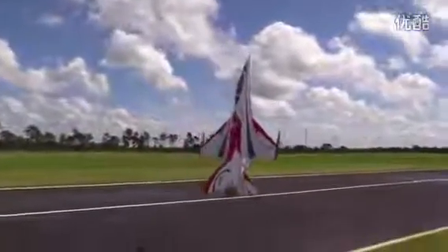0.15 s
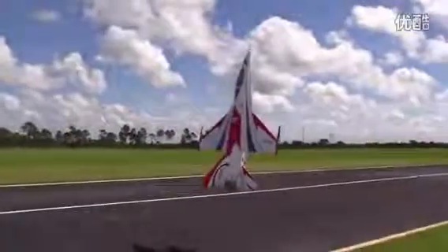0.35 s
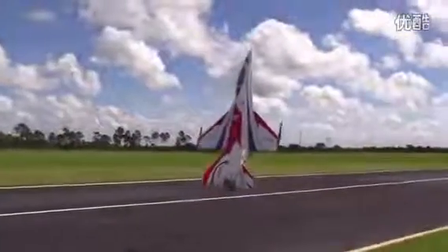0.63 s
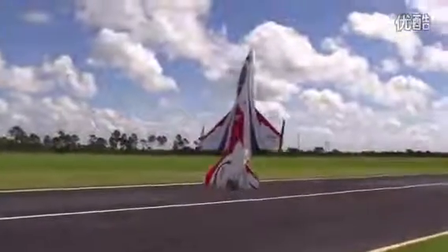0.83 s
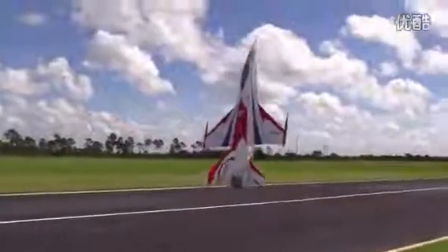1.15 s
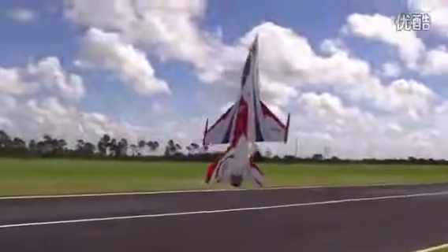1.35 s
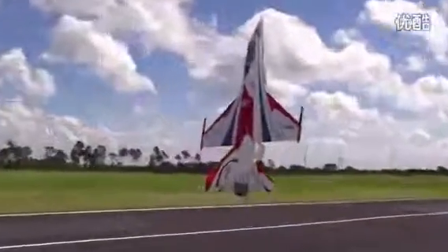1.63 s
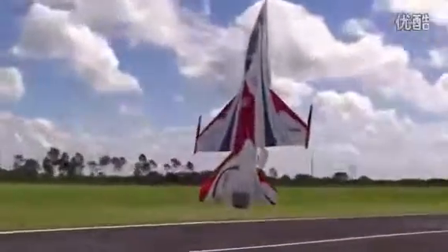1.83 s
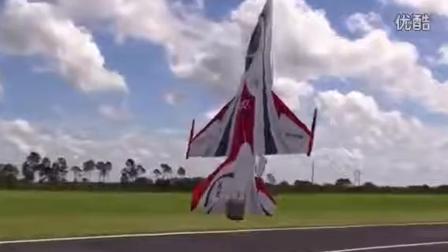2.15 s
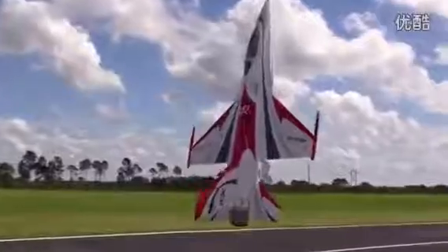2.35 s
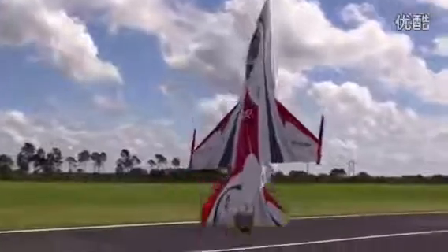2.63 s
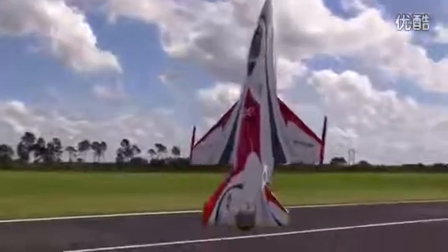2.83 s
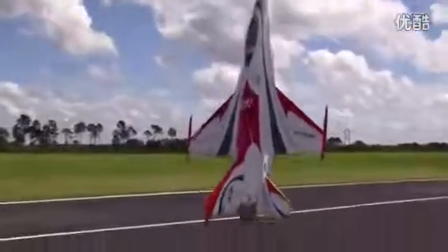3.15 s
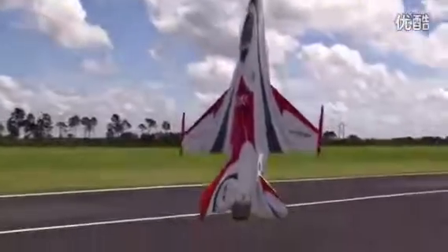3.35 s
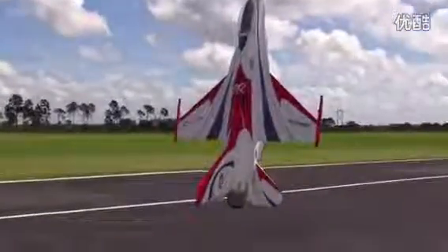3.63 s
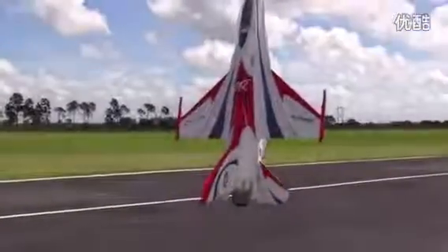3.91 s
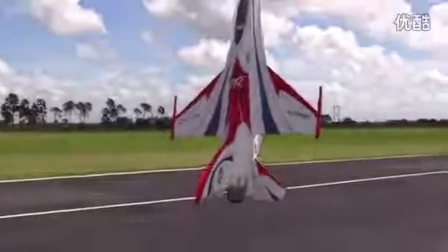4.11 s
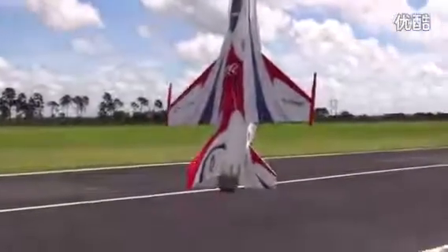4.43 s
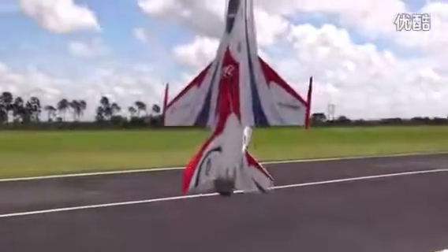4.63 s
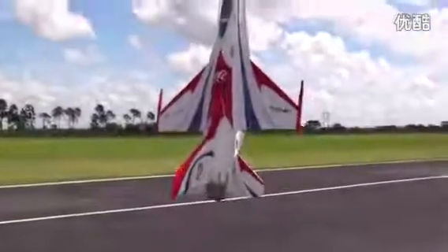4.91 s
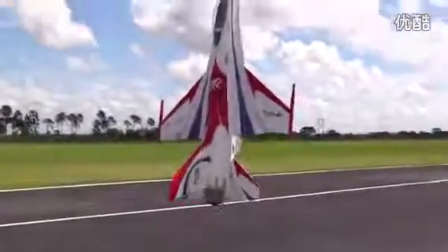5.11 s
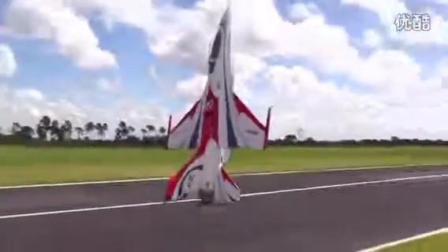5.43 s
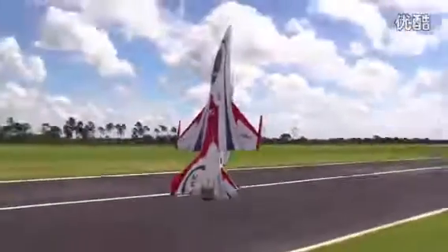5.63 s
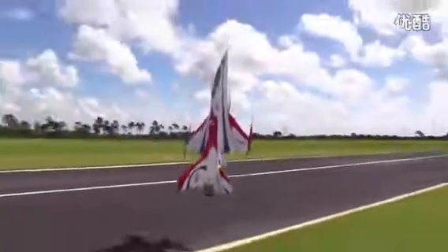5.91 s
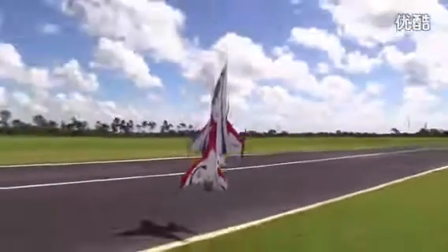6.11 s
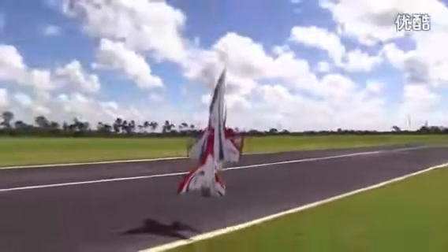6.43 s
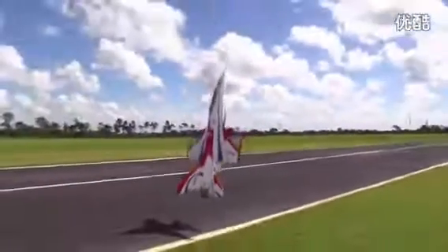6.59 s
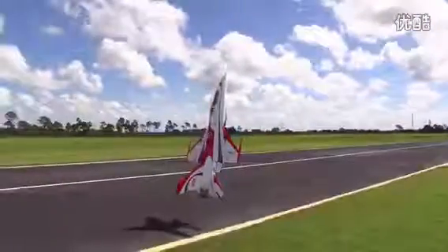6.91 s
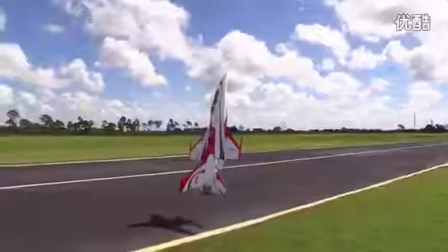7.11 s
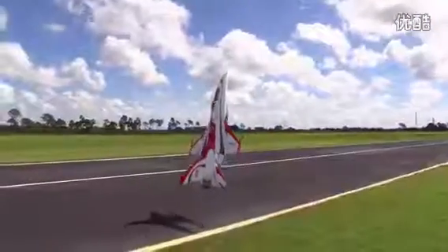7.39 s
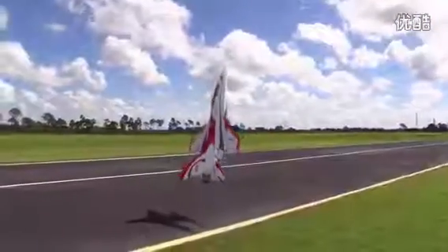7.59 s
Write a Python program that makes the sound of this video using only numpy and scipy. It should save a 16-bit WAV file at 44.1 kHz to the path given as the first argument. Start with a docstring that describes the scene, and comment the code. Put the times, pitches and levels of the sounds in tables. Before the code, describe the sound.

Outdoors over a runway, the exhaust of a small hovering jet plane roars and hisses without a break. Brief flares of hiss come and go while a hollow whine glides up, sinks and rises again within the rush. A faint rumble puffs underneath, and the engine is strongest towards the end. The microphone gives a thin, slightly watery mono sound.

```python
"""A model jet hovers on its tail just above a runway, drifting towards the listener and away again.
Its turbulent exhaust is a roar, a rush and a hiss that swells as the nozzle swings, over a faint rumble.
The tarmac returns an echo about a millisecond late, and the changing lag sweeps a hollow, whining pitch
through the noise. The sound is mono and thin in the bass; a noise suppressor deepens its hollows."""
import sys
import numpy as np
from scipy import signal
from scipy.fft import rfft, irfft
from scipy.io import wavfile
from scipy.ndimage import uniform_filter1d, map_coordinates

SR = 44100
rng = np.random.default_rng(int(sys.argv[2]) if len(sys.argv) > 2 else 0)


def master_out(mix):
    """Clip the mix to full scale and print it as 16-bit PCM to the path in sys.argv[1]."""
    frames = np.transpose(np.atleast_2d(mix))
    ceiling = np.clip(frames, -1, 1)
    pcm = np.round(ceiling * 32767).astype(np.int16)
    wavfile.write(sys.argv[1], SR, pcm)


N = 341775
TIME = np.arange(N) / SR
BINS_HZ = np.maximum(np.arange(N // 2 + 1) * SR / N, 1)


def from_db(db):
    """Decibels to gain."""
    return 10 ** (np.asarray(db) / 20)


def rms_one(x):
    """Scale to rms 1."""
    return x / np.sqrt(np.mean(x ** 2) + 1e-20)


def curves(rows):
    """Draw each column after the time as an automation curve, one value a sample."""
    seconds, *columns = np.transpose(rows)
    return [np.interp(TIME, seconds, column) for column in columns]


def swells(rows):
    """Smooth bumps and dips in dB, each centred on its time."""
    return sum(db * np.cos(np.pi * np.clip((TIME - centre) / length, -.5, .5)) ** 2
               for centre, length, db in rows)


def drift(rate):
    """Random wander with spread 1 that changes about `rate` times a second."""
    hop, settle = 40, 2000
    pole = np.exp(-2 * np.pi * rate * hop / SR)
    noise = rng.standard_normal(N // hop + settle + 2)
    slow = signal.lfilter([1], [1, -2 * pole, pole * pole], noise)[settle:]
    return np.interp(np.arange(N) / hop, np.arange(len(slow)), rms_one(slow))


def coloured(x, spectrum):
    """Equalise by a spectrum that falls 40 dB an octave beyond its ends."""
    hz, db = np.transpose(spectrum)
    octaves_out = np.abs(np.log2(BINS_HZ / np.clip(BINS_HZ, hz[0], hz[-1])))
    gain_db = np.interp(np.log(BINS_HZ), np.log(hz), db) - 40 * octaves_out
    return irfft(rfft(x) * from_db(gain_db), N)


def turbulence(spectrum, level_db, flutter_db, flutter_rate):
    """Noise of one range of eddy sizes, fluttering about its level."""
    noise = rms_one(coloured(rng.standard_normal(N), spectrum))
    return noise * from_db(level_db + flutter_db * drift(flutter_rate))


def ride_band(x, low_hz, high_hz, lift_db):
    """One band swells and fades on its own."""
    bandpass = signal.butter(3, [low_hz, high_hz], "band", fs=SR, output="sos")
    return x + signal.sosfilt(bandpass, x) * (from_db(lift_db) - 1)


def rippled(x, share, longest_ms, rate, count):
    """Short delays fade in and out and ripple the spectrum: a patchy, slightly watery texture."""
    lags = (rng.uniform(longest_ms / 10, longest_ms, count) * SR / 1000).astype(int)
    taps = sum(np.roll(x, lag) * drift(rate) for lag in lags) / np.sqrt(count)
    return (x + share * taps) / np.sqrt(1 + share ** 2)


# The rumble's tone. Each row: frequency in Hz, relative level in dB.
RUMBLE_TONE = [(25, -20), (60, -22), (110, -18), (170, -6.2), (250, 0), (350, 1.2), (480, 1.8), (650, -7),
               (1000, -26)]
# Its fader ride. Each row: time in seconds, relative level in dB.
RUMBLE_RIDE = [(0, -65.5), (.5, -69), (.85, -58.5), (1.25, -62.5), (2.5, -56.5), (3.1, -62), (3.6, -56.5),
               (4.15, -55), (4.65, -56), (4.84, -45), (5.0, -51.5), (5.35, -56), (5.75, -55), (6.0, -51.5),
               (6.4, -51), (7.1, -56.5), (7.75, -60)]
# It drops out briefly. Each row: centre in seconds, length in seconds, dip in dB.
RUMBLE_LULLS = [(3.705, 0.15, -19), (3.9, 0.1, -14), (4.04, 0.096, -15), (4.195, .13, -17),
                (4.443, 0.27, -20), (4.722, 0.1, -21), (4.96, .1, -6), (5.495, 0.1, -11),
                (6.07, 0.054, -12), (6.27, 0.085, -18), (6.565, 0.099, -18), (6.733, .06, -20),
                (6.92, 0.054, -12), (7.62, 0.11, -20)]
# It puffs as the exhaust slaps the tarmac. Each row: peak in seconds, length in seconds, lift in dB.
RUMBLE_PUFFS = [(3.99, .1, 2.5), (4.1, .1, 3), (4.63, .18, 8), (5.05, .12, 7.5), (5.4, .07, 4),
                (5.62, 0.18, 8), (5.79, .08, 4), (5.89, .06, 7), (6.0, 0.12, 6), (6.125, 0.078, 6),
                (6.66, .12, 1), (6.83, 0.053, 6), (7.07, 0.065, 7.5), (7.125, .06, 8)]

def tarmac_rumble():
    """The jet spreads over the tarmac in a deep, uneven rumble."""
    ride_db, = curves(RUMBLE_RIDE)
    level_db = ride_db + swells(RUMBLE_LULLS) + swells(RUMBLE_PUFFS) + 6
    return turbulence(RUMBLE_TONE, level_db, flutter_db=2.5, flutter_rate=17)


# The tones of the plume's three layers. Each row: frequency in Hz, relative level in dB.
ROAR_TONE = [(490, -42), (575, -29), (640, -21), (720, -6.3), (820, -1.7), (1000, 1.6), (1300, -1),
             (1600, -4.5), (1850, -1.5), (2200, -7.5)]
RUSH_TONE = [(1100, -23), (1450, -4), (1750, -6), (2100, -0.5), (2550, -2), (3000, 0.04), (3500, -3.5),
             (4000, -2.5), (4500, -5.5), (5200, -6.5), (7000, -39.5)]
HISS_TONE = [(2500, -21), (3800, -14), (4700, -3.5), (5400, 2.5), (6200, 1.65), (7400, 0.5), (8200, -1.5),
             (8900, -5), (9580, -5.5), (9750, -11.5), (10300, -11), (10800, -26.5)]
# Fader rides that follow throttle and distance.
# Each row: time in seconds, then relative levels in dB of the roar, the rush and the hiss.
PLUME_RIDES = [(0.0, -25.5, -23, -22), (0.57, -25, -25, -22), (0.92, -24, -23.3, -24.5),
               (1.12, -23.7, -22.5, -25.3), (1.35, -28.5, -23, -24.5), (2.07, -26, -24.2, -22.7),
               (2.59, -23.5, -22.5, -23), (2.77, -23, -23, -23), (3.4, -24, -22, -22.5),
               (3.87, -22.5, -23, -23.5), (4.18, -23.5, -21.5, -21), (4.48, -24.5, -24.5, -26),
               (4.96, -22.2, -20.5, -20.1), (5.3, -27.5, -23, -23), (5.65, -25.5, -23.5, -23),
               (6.07, -24.5, -20.5, -22), (6.3, -25.5, -23.5, -24.5), (6.98, -26, -22, -23.5),
               (7.15, -22.5, -18.5, -21), (7.5, -19.5, -19.5, -22), (7.75, -20.5, -20.5, -20.5)]
# The plume turns towards the listener. Each row: peak in seconds, length in seconds, lift in dB.
RUSH_SURGES = [(2.18, 0.14, 3.5), (2.54, 0.28, 2.2), (4.22, .25, 1), (5.6, 0.19, 3.5), (7.48, .13, 0.5)]

def plume(swing_db):
    """Large eddies far down the plume roar, the plume rushes, and small eddies at the nozzle hiss."""
    roar_db, rush_db, hiss_db = curves(PLUME_RIDES)
    rush_db = rush_db + 0.29 * swing_db + swells(RUSH_SURGES)
    roar = turbulence(ROAR_TONE, roar_db + 0.5, flutter_db=0.5, flutter_rate=13)
    rush = turbulence(RUSH_TONE, rush_db + 0.34, flutter_db=0.53, flutter_rate=12)
    hiss = turbulence(HISS_TONE, hiss_db + swing_db, flutter_db=0.63, flutter_rate=9.4)
    return roar, rush, hiss


# The low edge near 600 Hz drops out briefly. Each row: centre in seconds, length in seconds, dip in dB.
EDGE_DROPOUTS = [(3.57, 0.31, -18), (4.33, 0.11, -12), (5.2, .13, -14), (5.45, 0.17, -14),
                 (6.05, 0.071, -9), (6.35, 0.14, -10)]
# The rush's beam near 3 kHz sweeps across the listener in a piercing flare.
# Each row: peak in seconds, length in seconds, lift in dB.
RUSH_FLARES = [(2.52, 0.27, 5.8), (4.24, .2, 2), (7.15, 0.32, 1.3), (7.47, .18, 5.5)]

def wavering_bands(roar, rush, hiss, swing_db):
    """The low edge near 600 Hz flickers and drops out briefly; steering makes the rush's bite and hiss's top
    wander."""
    edge_db = swells(EDGE_DROPOUTS) + 4.2 * drift(rate=13)
    bite_db = swells(RUSH_FLARES) + 0.9 * drift(rate=7.7)
    top_db = 0.12 * swing_db + 1.46 * drift(rate=7.7)
    return (ride_band(roar, low_hz=480, high_hz=741, lift_db=edge_db),
            ride_band(rush, low_hz=2600, high_hz=3510, lift_db=bite_db),
            ride_band(hiss, low_hz=6900, high_hz=15000, lift_db=top_db))


# The echo is dull: the plume is a long source, so only its longer waves return in step.
# Each row: frequency in Hz, gain in dB.
ECHO_TONE = [(150, -3.5), (450, -1), (1000, -0.5), (2400, 0.5), (3500, -3), (4500, -8), (7000, -7)]

def echoed(x, lag_ms, strength):
    """Direct sound plus its ground echo: a comb whose teeth glide as the jet moves."""
    delayed_index = np.arange(N) - lag_ms * SR / 1000
    echo = map_coordinates(coloured(x, ECHO_TONE), [delayed_index], order=3, mode="mirror")
    return (x + strength * echo) / np.sqrt(1 + strength ** 2)


# The runway's echo follows the jet's height and distance. Each row: time in seconds,
# the roar's lag in ms and strength from 0 to 1, then the same two for the rush.
PLUME_BOUNCE = [(0.0, 1.19, 0.53, 1.1, 0.1), (0.35, 1.315, 0.66, 1.18, 0.25),
                (0.65, 1.27, 0.53, 1.23, 0.25), (0.95, 1.14, 0.73, 1, 0.3), (1.25, 0.87, 0.2, 0.92, 0),
                (1.65, 0.89, 0.3, 0.82, 0.13), (2.05, 0.83, 0.42, 0.84, 0.07),
                (2.45, 0.98, 0.37, 1.03, 0.28), (2.72, 1.19, 0.8, 1.14, 0.3), (2.95, 1.27, 0.7, 1.25, 0.32),
                (3.2, 1.43, 0.62, 1.36, 0.35), (3.5, 1.6, 0.3, 1.5, 0.44), (3.95, 1.56, 0.53, 1.47, 0.42),
                (4.25, 1.4, 0.34, 1.3, 0.2), (4.55, 1.15, 0.88, 1.13, 0.23), (4.95, 1.15, 0.36, 1.06, 0.3),
                (5.3, 1.0, 0.6, 0.976, 0.38), (5.6, 1, 0.25, .96, 0.44), (5.95, 1.12, 0.75, 1.03, 0.42),
                (6.5, 1.19, 0.6, 1.094, 0.55), (6.95, 1.14, 0.58, 1.06, 0.3), (7.3, 1.06, 0.32, 0.99, 0.38),
                (7.55, 0.95, 0.4, .94, 0.26), (7.75, 0.74, 0.36, 0.61, 0.3)]
# The echo of the ground-hugging rumble. Each row: time in seconds, lag in ms, strength from 0 to 1.
RUMBLE_BOUNCE = [(0, 1.7, 0.74), (.6, 1.27, 0.9), (1.0, 1.02, 0.94), (2.0, 1.05, 0.93), (3.0, 1.15, 0.87),
                 (3.6, 1.26, 0.55), (4.7, 1.2, 0.61), (7.75, 1.14, 0.53)]

def over_runway(rumble, roar, rush, hiss):
    """Each layer bounces off the runway with its own lag, into a low and a high bus."""
    roar_lag, roar_echo, rush_lag, rush_echo = curves(PLUME_BOUNCE)
    hiss_lag = 1.25 * rush_lag   # the hiss is born highest above the tarmac
    low = echoed(rumble, *curves(RUMBLE_BOUNCE)) + echoed(roar, roar_lag, roar_echo)
    high = echoed(rush, rush_lag, rush_echo) + echoed(hiss, hiss_lag, strength=0.3)
    return low, high


# Passing notches. Each row: centre in seconds, length in seconds, frequency in Hz, dip in dB.
NOTCHES = [(1.5, 0.51, 3240, -4), (1.9, 0.4, 3380, -7), (2.42, .2, 3330, -6), (2.935, .36, 3570, -15),
           (5.6, .16, 3720, -5), (6.03, .14, 3640, -5)]

def hollowed(x, width_hz=260):
    """Narrow hollows open in the upper midrange and close again."""
    for centre, length, hz, db in NOTCHES:
        x = ride_band(x, hz - width_hz / 2, hz + width_hz / 2, swells([(centre, length, db)]))
    return x


# The nozzle swings towards the listener (+) or away (-), and back.
# Each row: turning point in seconds, length in seconds, lift of the hiss in dB.
NOZZLE_SWINGS = [(.54, .07, -2.5), (.61, .11, 2), (.81, 0.074, 2), (.93, .09, 2), (1.1, 0.18, 6),
                 (1.215, 0.22, 7.6), (1.4, .14, 3), (1.56, 0.066, -3), (1.68, 0.13, 4), (1.92, .16, 3.5),
                 (2.07, 0.13, -3.5), (2.29, .16, -0.5), (2.43, .08, 4), (2.62, 0.14, 3.5), (3.03, 0.087, 4),
                 (3.12, 0.12, 4), (3.37, 0.08, 3), (3.76, 0.22, 3.5), (4.0, 0.37, 3.5), (4.14, 0.12, 1),
                 (4.255, .16, 4.3), (4.39, .14, 4.5), (4.6, 0.14, 3.5), (4.68, .07, -1.5), (5.1, .07, -2),
                 (5.175, 0.12, 5.5), (5.6, 0.086, 5), (5.68, 0.11, -2.5), (5.99, .1, 2.5), (6.16, 0.17, 2),
                 (6.3, 0.093, -1.5), (6.48, 0.14, 4), (6.65, 0.15, 9), (6.82, 0.09, 3), (6.95, .11, 3.5),
                 (7.14, 0.15, 3.5), (7.49, 0.25, 6.4), (7.665, 0.21, 4.2)]

def scene():
    """The hovering jet, alike in both channels."""
    swing_db = swells(NOZZLE_SWINGS)
    rumble = tarmac_rumble()
    roar, rush, hiss = plume(swing_db)
    rumble = rippled(rumble, share=0.7, longest_ms=11.85, rate=6.1, count=6)
    roar, rush, hiss = wavering_bands(roar, rush, hiss, swing_db)
    rush = rippled(rush, share=0.26, longest_ms=9, rate=5, count=14)
    hiss = rippled(hiss, share=0.31, longest_ms=9, rate=3.5, count=16)
    low, high = over_runway(rumble, roar, rush, hiss)
    jet = low + hollowed(high)
    return np.array([jet, jet])


# The suppressor's threshold. Each row: frequency in Hz, level in dB per Hz relative to the total power.
GATE_THRESHOLD = [(100, -83), (250, -77), (470, -70), (580, -68.5), (680, -48.5), (780, -44), (1200, -43),
                  (2400, -42), (3500, -44), (4600, -44), (7000, -48), (9000, -50), (10500, -50)]

def suppressed(x, depth_db, knee_db, size):
    """Narrow bands that fall below a threshold, which rides on the overall level, are turned down."""
    framing = dict(fs=SR, nperseg=size, noverlap=size * 3 // 4, scaling="psd")
    hz, _, frames = signal.stft(x, **framing)
    power = uniform_filter1d(np.abs(frames) ** 2, size=3, axis=0)   # smooth across frequency
    power = uniform_filter1d(power, size=5, axis=1)   # and over time
    share_per_hz = np.abs(power) / (power.sum(axis=0) * hz[1])
    threshold_db = np.interp(hz, *np.transpose(GATE_THRESHOLD))
    under_db = threshold_db[:, None] - 10 * np.log10(share_per_hz + 1e-20)
    gain = from_db(-depth_db * np.clip(under_db / knee_db, 0, 1))
    return signal.istft(frames * gain, **framing)[1][:N]


def record(dry):
    """A mono chain: the suppressor deepens the hollows, the treble ends steeply and peaks crackle."""
    treble_end_hz, crackle_end_hz = 10869, 15800
    treble_cut = signal.ellip(10, .1, 80, treble_end_hz, fs=SR, output="sos")
    crackle_cut = signal.ellip(10, .1, 80, crackle_end_hz, fs=SR, output="sos")
    mono = suppressed(dry.mean(axis=0), depth_db=23.0, knee_db=0.5, size=1024)
    mono = signal.sosfilt(treble_cut, mono)
    mono = np.clip(mono, -.74, .74)   # only the loudest peaks overload
    return signal.sosfilt(crackle_cut, [mono, mono])


dry = scene()
out = record(dry)
master_out(out)
```